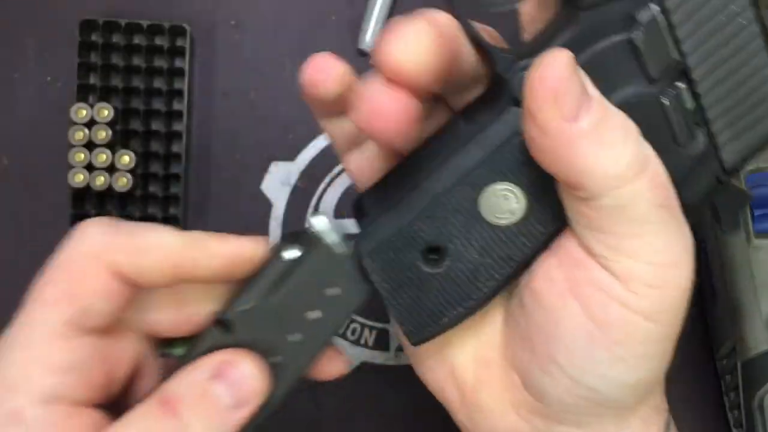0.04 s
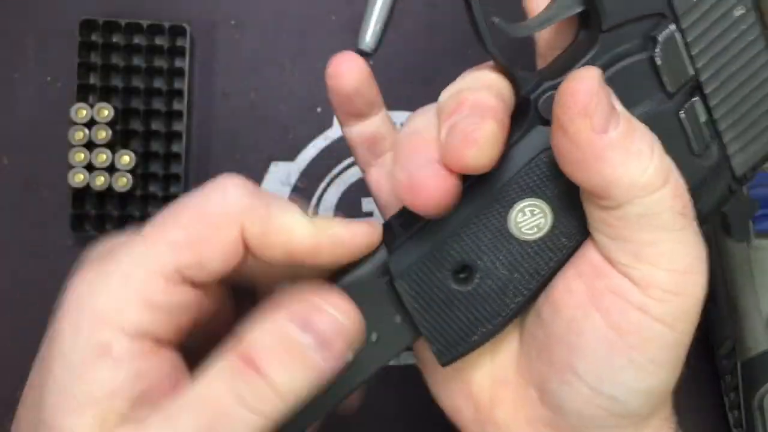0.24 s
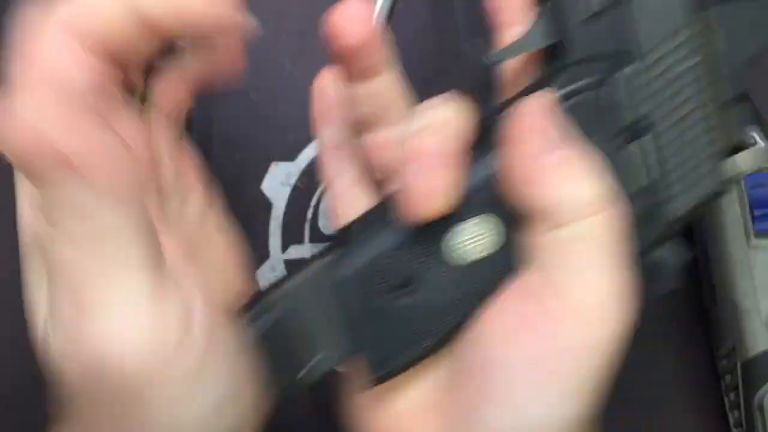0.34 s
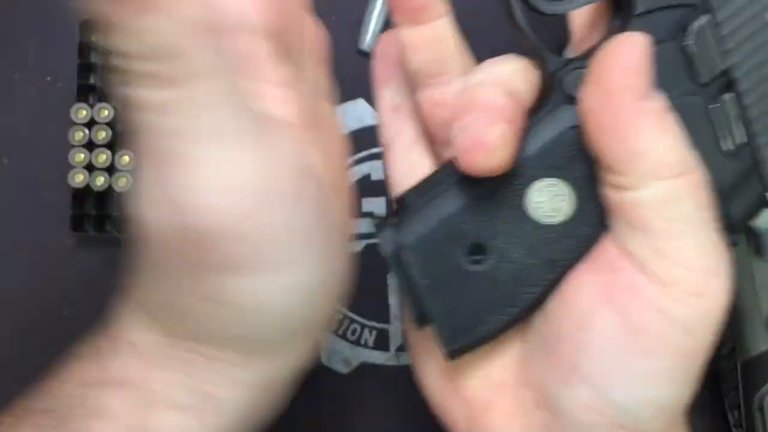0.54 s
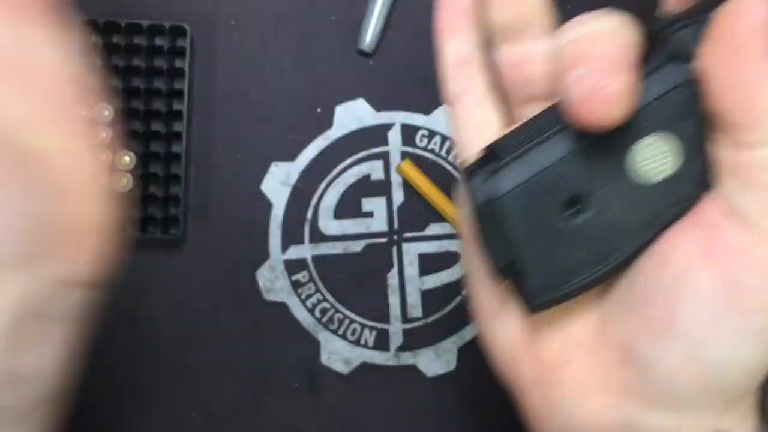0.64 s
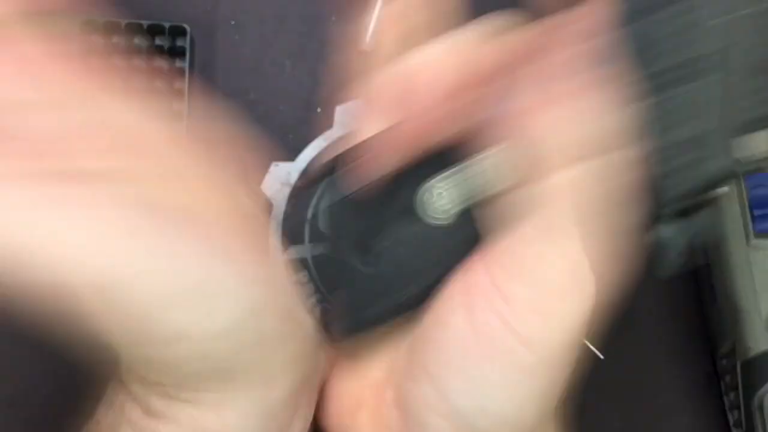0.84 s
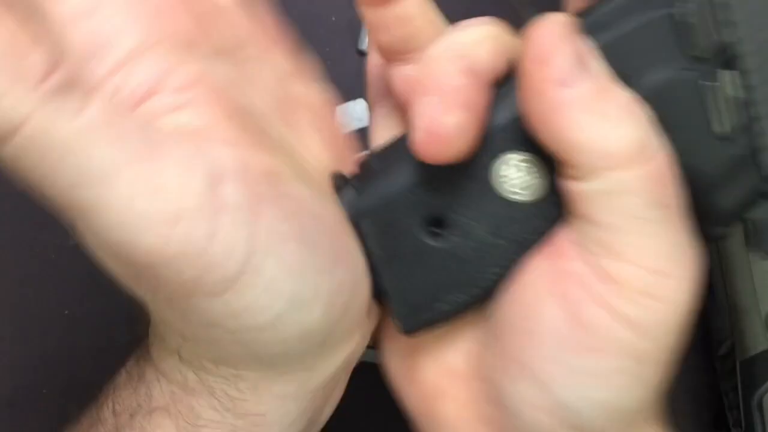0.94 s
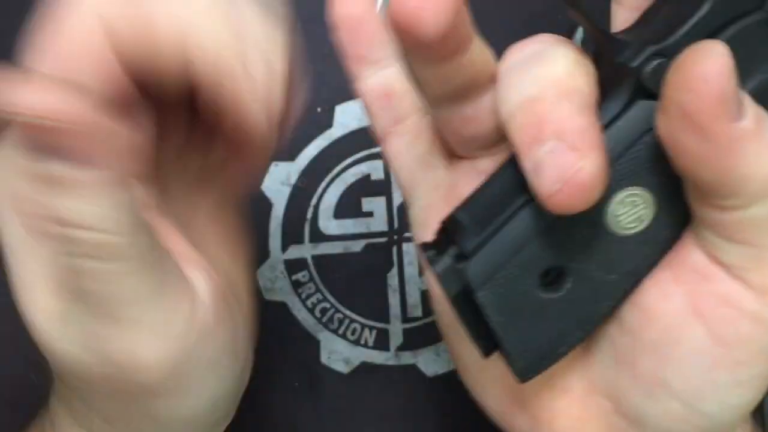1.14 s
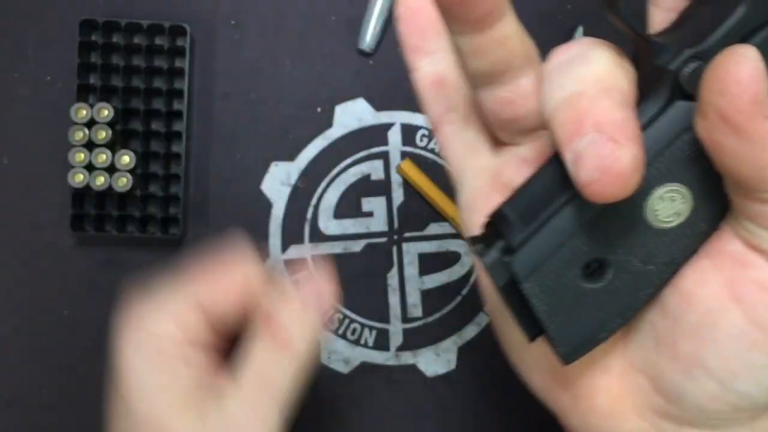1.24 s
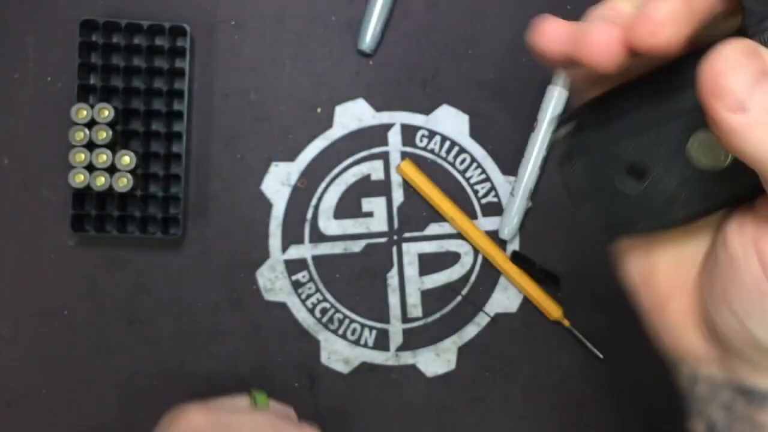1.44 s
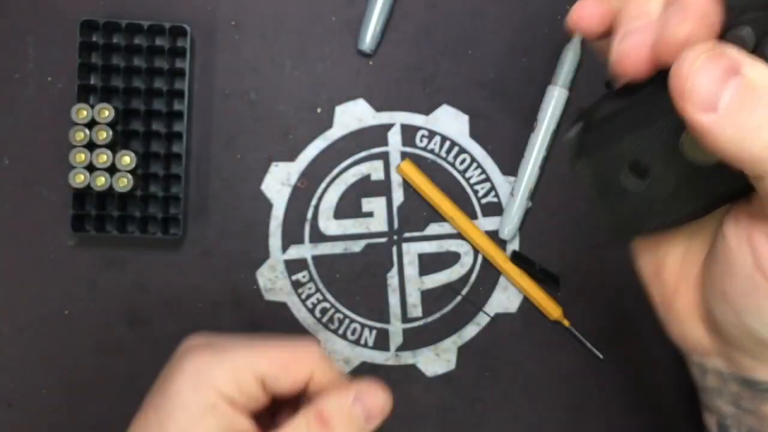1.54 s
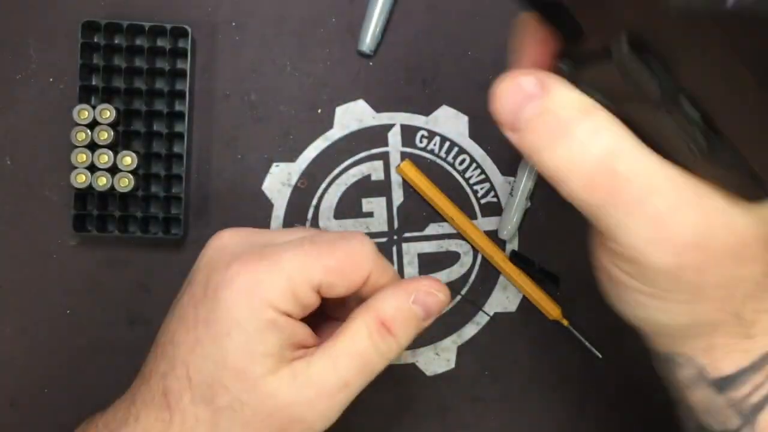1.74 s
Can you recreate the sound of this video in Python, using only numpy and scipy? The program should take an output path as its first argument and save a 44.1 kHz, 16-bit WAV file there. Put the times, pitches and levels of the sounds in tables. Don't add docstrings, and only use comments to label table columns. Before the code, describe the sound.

Pistol magazine insertion: metallic knocks, a sharp locking clack, then a hard, thudding palm slap

```python
import sys
import numpy as np
from scipy import signal
from scipy.fft import rfft, irfft
from scipy.io import wavfile

SR = 44100
rng = np.random.default_rng(int(sys.argv[2]) if len(sys.argv) > 2 else 0)


def dump(signal):
    limited = np.clip(np.atleast_2d(signal).T, -1, 1)
    pcm = np.round(limited * 32767).astype(np.int16)
    wavfile.write(sys.argv[1], SR, pcm)


def how_loud(loudness_db):
    steps = np.asarray(loudness_db, float) / 20
    return 10 ** steps


N = 79380
OVERLOAD = 1.0
TREBLE_LIMIT_HZ = 15700

# (frequency [Hz], density [dB per Hz])
FLOOR_SPECTRUM = [(20, -12), (58, 0), (110, -9), (300, -13), (550, -22), (2500, -23), (6000, -29),
                  (15700, -36)]
# (frequency [Hz], level [dB])
MAINS_HUM = [(59, -63), (294, -67)]
# (time [s], level [dB])
ARM_SHIFT = [(0, -75), (.1, -64), (.2, -72.5), (.35, -60), (.5, -66.5), (.77, -73), (.82, -69), (.9, -76),
             (.975, -76), (1.02, -45.5), (1.125, -58.5), (1.165, -45), (1.24, -47), (1.295, -65),
             (1.405, -71), (1.46, -45.5), (1.58, -64), (1.8, -79)]
# (frequency [Hz], density [dB per Hz])
BENCH_SPECTRUM = [(30, -10.5), (60, 5.5), (140, 9.64), (250, -6.5), (400, -23.5), (700, -31), (1500, -48.5)]
# (frequency [Hz], level [dB])
STEEL_MODES = [(1330, -0.5), (1640, -3.5), (2150, -23), (2350, -8), (2630, -10), (2860, -5.5), (3250, -11),
               (3560, -5.5), (4080, -7.5), (4520, -5.5), (5300, -1), (6900, -11), (9400, -5)]
# (frequency [Hz], density [dB per Hz])
CRACK_SPECTRUM = [(150, -29.5), (400, -20), (850, -8), (1300, 8.5), (3900, 2.96), (6500, -1.5),
                  (10500, -11), (15500, -12)]
# (time [s], frequency [Hz])
WELL_PITCH = [(.24, 1152), (.29, 1073), (.45, 1004), (.49, 1110), (1.0, 1196)]
# (time [s],
# level [dB], chatter [s], brightness [dB per octave], hollow ring [dB])
CONTACTS = [(.089, -55.5, 0.0087, 5, -4), (.2259, -24, 0.0034, 0, -14.5),
            (.2389, -5, 0.00087, 0.7, -0.5), (0.2437, -15, .002, -1.14, 1),
            (.258, -30.5, 0.0078, -0.9, 7.5), (0.2909, -9, .0012, 0.86, 7.5),
            (.3102, -18, 0.0022, 0, -11.5), (.3167, -17, 0.0029, 2.7, -1),
            (.373, -30.5, 0.00067, 1.2, -6.5), (0.386, -28.5, 0.006, 2.7, 0),
            (.4075, -29, 0.0045, 2.4, -5.5), (.428, -23.5, 0.0042, 2.3, -9),
            (.431, -21, 0.0017, 1.85, -8), (.4425, -26, 0.012, -1, 5.5), (.457, -30.5, 0.016, 4.9, 3),
            (.4674, -16, 0.0028, 2.5, -7.5), (.472, -19.5, 0.0025, -0.9, -6.5),
            (.4812, -10, .002, 0.7, -2.5), (.485, -6, 0.0027, 0.5, -12),
            (.4893, 1, 0.0086, 4.45, -10.5), (.505, -19.5, 0.0034, 4, -9),
            (.7777, -37, .004, -0.65, 2), (0.9492, -46.5, .0015, 3.5, -14.5),
                   (.956, -48, .0015, 0.7, -11.5), (.963, -45.5, .005, -0.6, -7.5),
                   (.9706, -18.5, .001, -8.5, -7), (0.9721, 0, .0035, 1.5, 1.5),
                   (0.9775, -2, 0.0033, 2.6, -9), (0.983, -15, .003, 3.9, -3),
                   (1.0058, -5, 0.00075, 4.9, -6), (1.0722, -30, 0.00092, 4, -13),
                   (1.387, -42, 0.0068, -4.6, 2), (1.794, -33.5, 0.003, -4.65, -3.5)]
# (frequency [Hz], fall by 60 dB [s])
ROOM_DECAY = [(100, .2), (500, 0.096), (1500, 0.37), (4000, 0.34), (9000, 0.33), (15000, 0.1)]
# (frequency [Hz], level [dB])
ECHO_COLOUR = [(100, -19.5), (600, 6.5), (1500, -0.5), (4000, 5.1), (9000, -2), (15000, 4)]
# (time [s], level [dB])
SLIDE_PRESSURE = [
    (0.23, -58.5),
    (0.278, -55),
    (0.398, -35),
    (0.432, -39),
    (0.485, -32),
]
# (frequency [Hz], level [dB], fall by 60 dB [s])
GRIP_MODES = [(230.2, -30.5, .03), (354, -26, 0.018), (521.5, -30, 0.023)]
# (time [s], level [dB], frequency [Hz], fall by 60 dB [s])
SOFT_THUDS = [(.4935, -12.5, 165, 0.042), (.487, -24.5, 450, 0.056), (.494, -23, 43, 0.096),
              (.9762, 0, 120, .05), (.985, -20.5, 57, .1), (.9725, -11, 320, .02),
              (.975, -19.5, 351, 0.088), (1.1, -38.5, 145, 0.071), (.778, -43, 485, 0.027),
              (0.38, -37.5, 140, 0.14), (1.21, -42.5, 200, 0.083), (.386, -40.5, 590, .05),
              (0.52, -41, 160, .05), (1.388, -32.5, 290, .05), (1.416, -23.5, 154.2, 0.25),
              (1.42, -34.5, 380, 0.051), (1.15, -51, 91, 0.16)]
# (frequency [Hz], level [dB])
SPRING_MODES = [(9330, -44), (9420, -44.5), (9530, -40), (9640, -42.5)]
# (time [s], level [dB])
SKIN_BRUSH = [
    (1.37, -84.5),
    (1.39, -50.5),
    (1.42, -61),
    (1.46, -44),
    (1.49, -61.5),
    (1.55, -77.5),
]


def rms_one(x):
    return x / np.sqrt(np.mean(x ** 2) + 1e-20)


def at_hz(points, hz):
    table_hz, values = np.transpose(points)
    return np.interp(np.log(hz), np.log(table_hz), values)


def in_time(rows):
    s, db = np.transpose(rows)
    return how_loud(np.interp(np.arange(N) / SR, s, db, left=-150, right=-150))


def high_pass(x, hz):
    return signal.sosfilt(signal.butter(2, hz, "high", fs=SR, output="sos"), x)


def noise(points):
    hz = np.maximum(np.arange(N // 2 + 1) * SR / N, 10)
    spectrum = rfft(rng.standard_normal(N)) * how_loud(at_hz(points, hz))
    return rms_one(irfft(spectrum, N))


def floor():
    sos = signal.cheby2(12, 40, TREBLE_LIMIT_HZ + 300, fs=SR, output="sos")
    hiss = how_loud(-56) * signal.sosfilt(sos, noise(FLOOR_SPECTRUM))
    t = np.arange(N) / SR
    hum = sum(how_loud(db) * np.sin(2 * np.pi * hz * t) for hz, db in MAINS_HUM)
    return hiss + hum


def arm_shift():
    return in_time(ARM_SHIFT) * noise(BENCH_SPECTRUM)


def grains(per_s, size):
    born = rng.random(size) < per_s / SR
    sizes = np.minimum(rng.exponential(1, size), 3)
    spread_db = 3.5
    return rms_one(born * how_loud(spread_db * sizes) * rng.choice([-1, 1], size))


def ring(x, hz, t60):
    r, w = how_loud(-60 / (t60 * SR)), 2 * np.pi * hz / SR
    return signal.lfilter([0, np.sin(w)], [1, -2 * r * np.cos(w), r * r], x + 1e-18)


def colour(x, points, tilt_db=0.):
    size = 1024
    hz = np.maximum(np.arange(size // 2 + 1) * SR / size, 20)
    octaves = np.log2(np.clip(hz, 600, 16000) / 3500)
    gain = how_loud(at_hz(points, hz) + tilt_db * octaves)
    cepstrum = irfft(np.log(rms_one(gain) + 1e-9))
    cepstrum[1:size // 2] *= 2
    cepstrum[size // 2 + 1:] = 0
    response = irfft(np.exp(rfft(cepstrum)))
    return signal.fftconvolve(x, response)[:len(x)]


def body(x, tilt_db, hollow_db, hollow_hz, strikes):
    crack_db, steel_db, hollow_level_db = 1, -31.5, -23
    steel_t60_s, hollow_t60_s = .018, .024
    strike_spread_db = 2.5
    sound = how_loud(crack_db) * colour(x, CRACK_SPECTRUM, tilt_db)
    sound = sound + how_loud(hollow_level_db + hollow_db) * ring(x, hollow_hz, hollow_t60_s)
    for (hz, db), strike in zip(STEEL_MODES, strikes):
        level_db = db + steel_db + tilt_db * np.log2(hz / 3500) + strike_spread_db * strike
        sound = sound + how_loud(level_db) * ring(x, hz, steel_t60_s * np.sqrt(3500 / hz))
    return high_pass(sound, 696)


def contacts():
    chatter_per_s, chatter_t60_s, rise_s = 12000, .014, .0003
    out, t = np.zeros(N + SR), np.arange(4410) / SR
    for s, db, hold, tilt_db, hollow_db in CONTACTS:
        decay_db = 60 * np.maximum(t - hold, 0) / chatter_t60_s
        shape = how_loud(db - decay_db) * np.minimum(t / rise_s, 1)
        chatter = rms_one(shape * grains(chatter_per_s, len(t))) * np.sqrt(np.mean(shape ** 2))
        well_hz = np.interp(s, *np.transpose(WELL_PITCH))
        strikes = rng.standard_normal(len(STEEL_MODES))
        i = int(s * SR)
        out[i:i + len(t)] += body(chatter, tilt_db, hollow_db, well_hz, strikes)
    return out[:N]


def room(x):
    level_db, onset_s = -20.5, 0.0027
    t = np.arange(SR) / SR
    edges = 70 * 2 ** np.arange(0, 8.1, .5)
    white, echo = rng.standard_normal((2, SR)), 0
    for k, (low, high) in enumerate(zip(edges, edges[1:])):
        hz = np.sqrt(low * high)
        sos = signal.butter(2, [low, high], "band", fs=SR, output="sos")
        band = signal.sosfilt(sos, white[k % 2])
        echo = echo + band * how_loud(at_hz(ECHO_COLOUR, hz) - 60 * t / at_hz(ROOM_DECAY, hz))
    echo = echo * np.minimum(t / onset_s, 1) ** 2
    return how_loud(level_db) * signal.fftconvolve(x, echo / np.sqrt(np.sum(echo ** 2)))[:N]


def slide():
    scrape = how_loud(3) * in_time(SLIDE_PRESSURE) * grains(3000, N)
    steel = body(scrape, .4, -7, WELL_PITCH[2][1], np.zeros(len(STEEL_MODES)))
    grip = sum(how_loud(db) * ring(scrape, hz, t60) for hz, db, t60 in GRIP_MODES)
    return steel + grip


def thuds():
    rise_s = 0.00081
    out, t = np.zeros(N), np.arange(N) / SR
    for s, db, hz, t60 in SOFT_THUDS:
        age = np.maximum(t - s, 0)
        envelope = how_loud(db - 60 * age / t60) * (1 - np.exp(-age / rise_s))
        out -= envelope * np.sin(2 * np.pi * hz * age)
    return out


def latch_spring():
    snap_s, t60_s = .498, .28
    snap = np.arange(N) == int(snap_s * SR)
    return sum(how_loud(db) * ring(snap, hz, t60_s) for hz, db in SPRING_MODES)


def brush():
    return in_time(SKIN_BRUSH) * high_pass(rng.standard_normal(N), 4900)


def scene():
    near = contacts() + slide() + thuds() + latch_spring() + brush()
    return (floor() + arm_shift() + near + room(near))[None]


def roll_off(x):
    return signal.sosfilt(signal.butter(12, 16390, fs=SR, output="sos"), x)


def record(dry):
    x = high_pass(np.clip(dry, -OVERLOAD, OVERLOAD), 35)
    x = signal.sosfilt(signal.butter(4, TREBLE_LIMIT_HZ + 600, fs=SR, output="sos"), x)
    mix = np.clip(x, -OVERLOAD, OVERLOAD)
    return roll_off(mix)


dry = scene()
out = record(dry)
dump(out)
```